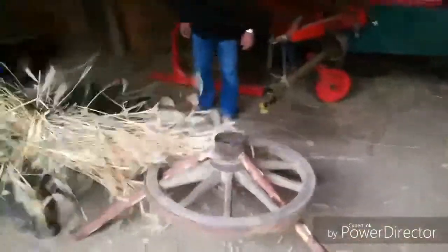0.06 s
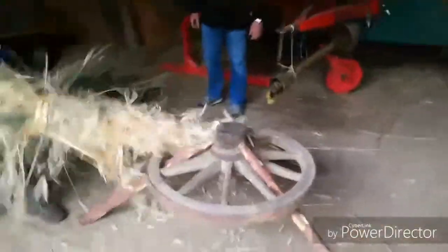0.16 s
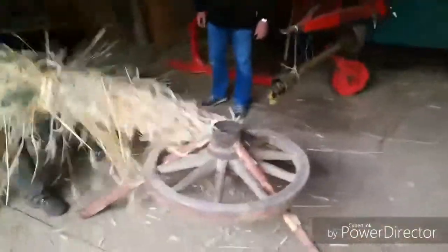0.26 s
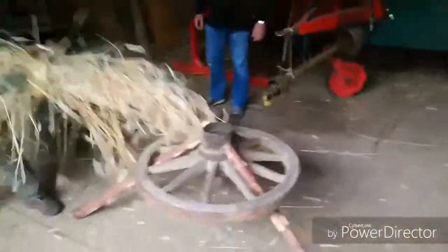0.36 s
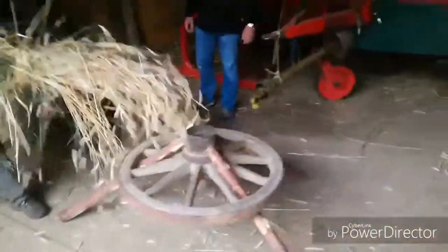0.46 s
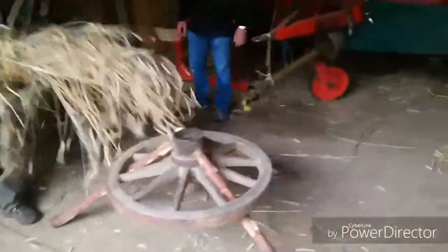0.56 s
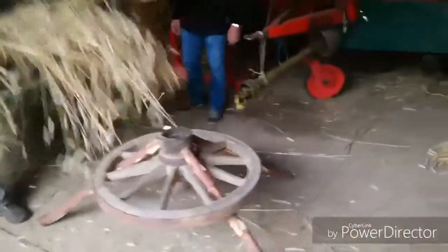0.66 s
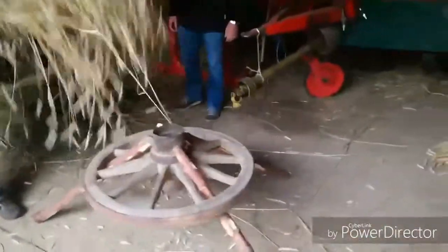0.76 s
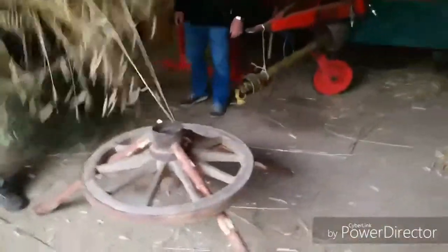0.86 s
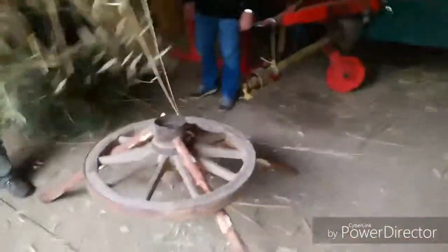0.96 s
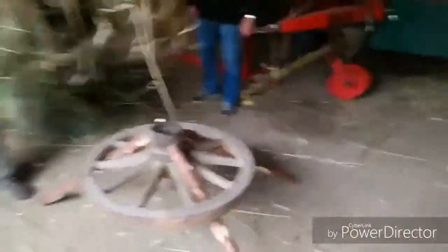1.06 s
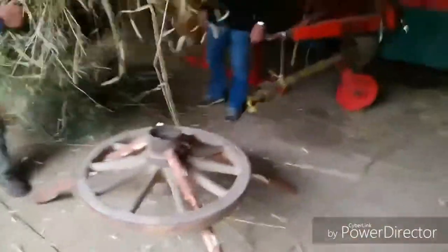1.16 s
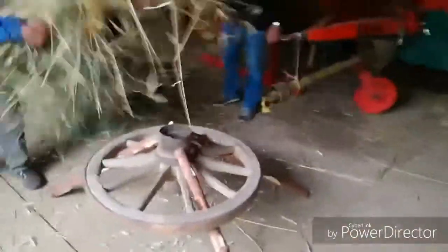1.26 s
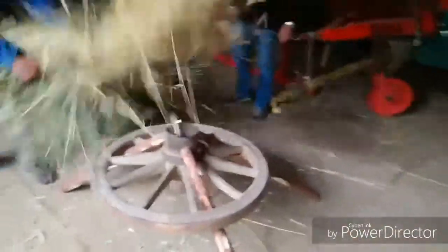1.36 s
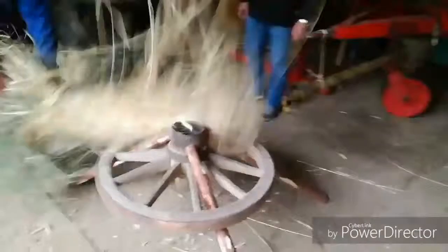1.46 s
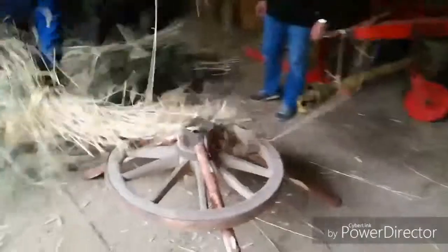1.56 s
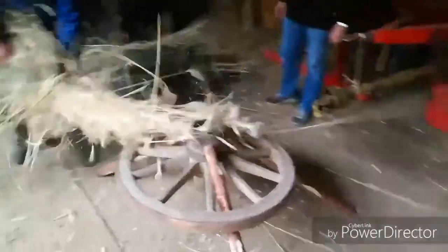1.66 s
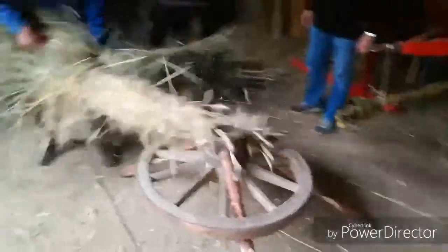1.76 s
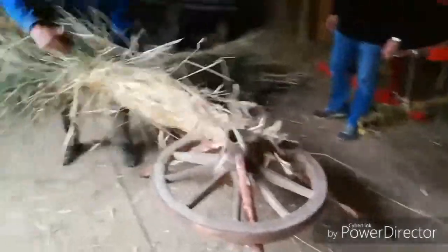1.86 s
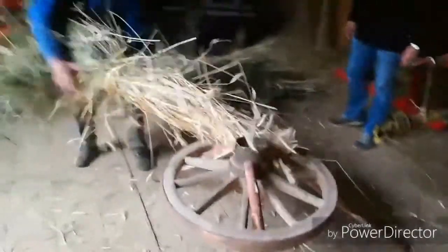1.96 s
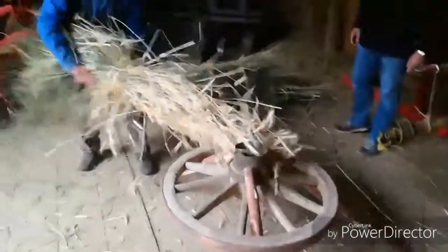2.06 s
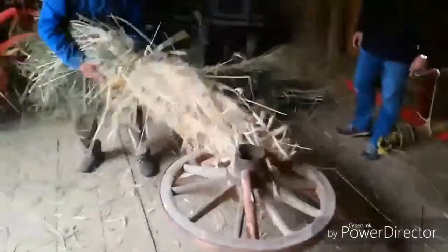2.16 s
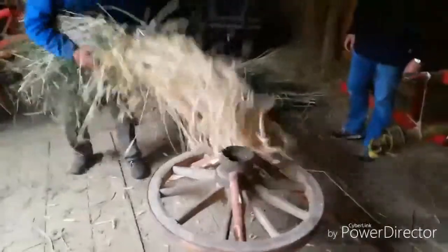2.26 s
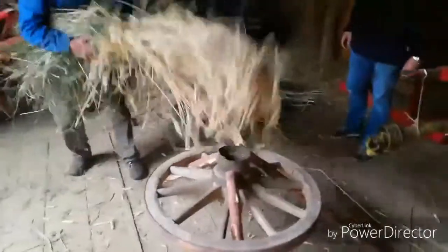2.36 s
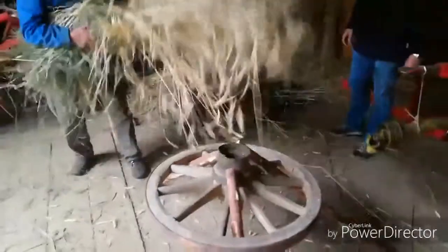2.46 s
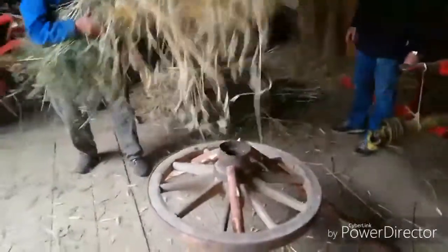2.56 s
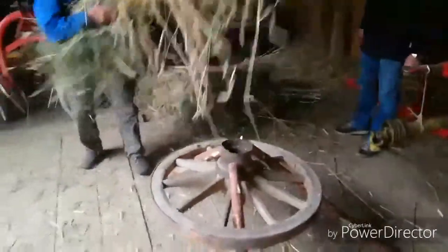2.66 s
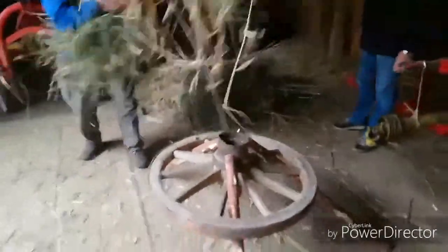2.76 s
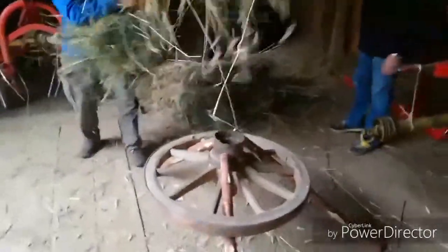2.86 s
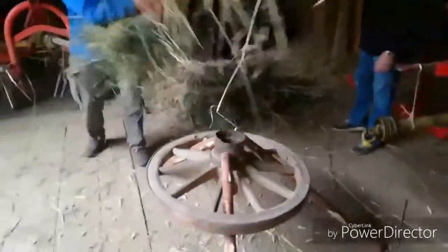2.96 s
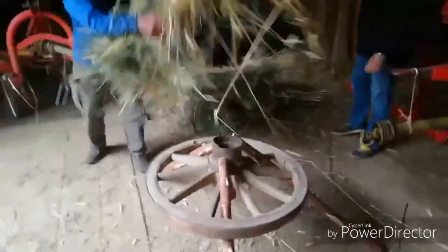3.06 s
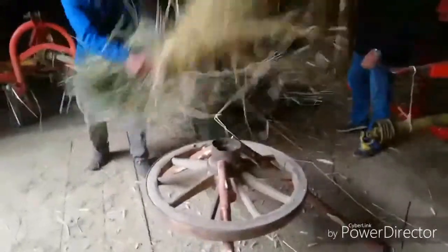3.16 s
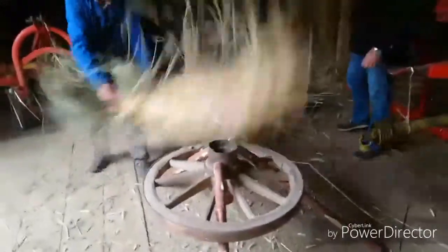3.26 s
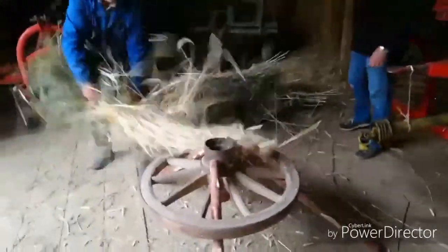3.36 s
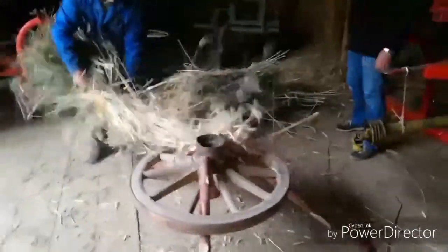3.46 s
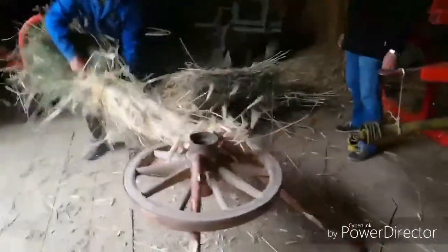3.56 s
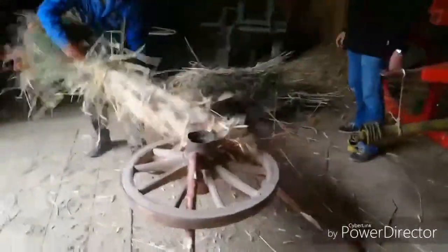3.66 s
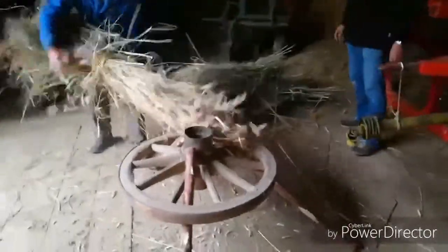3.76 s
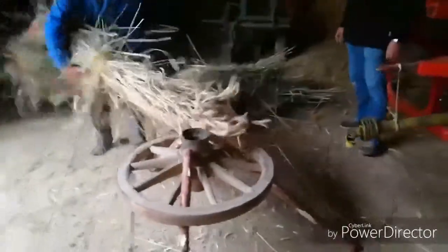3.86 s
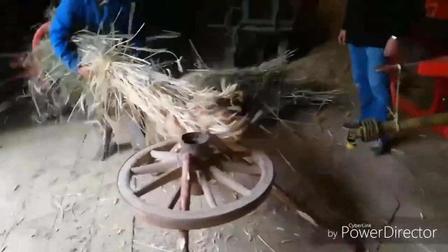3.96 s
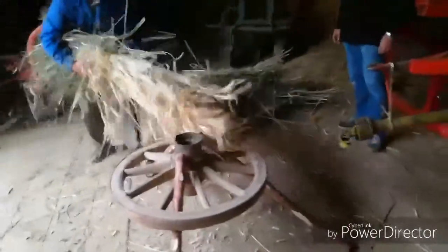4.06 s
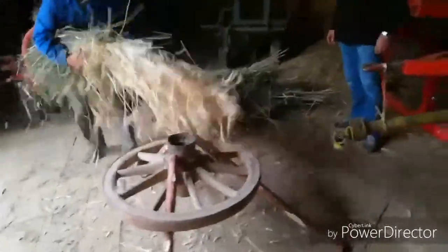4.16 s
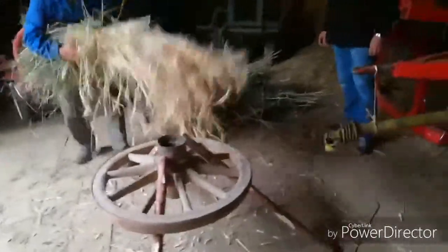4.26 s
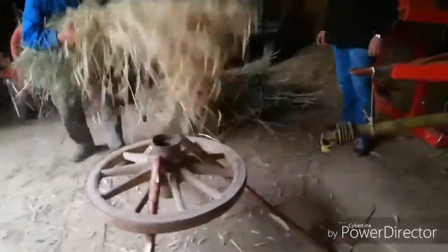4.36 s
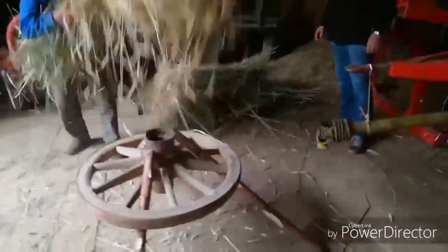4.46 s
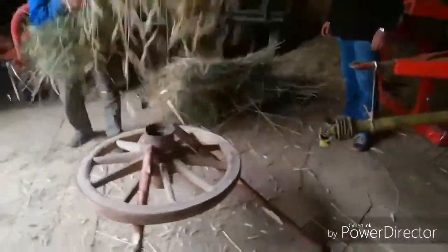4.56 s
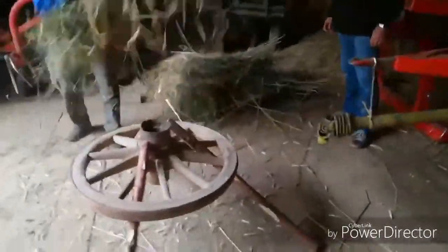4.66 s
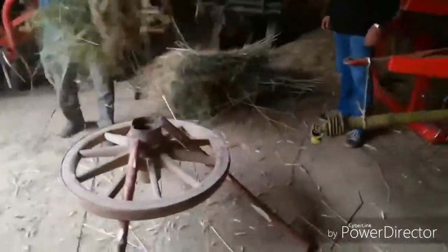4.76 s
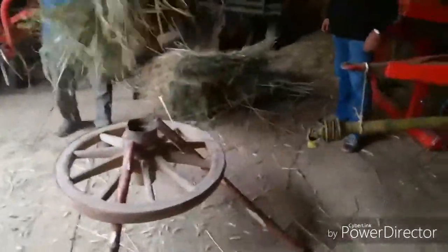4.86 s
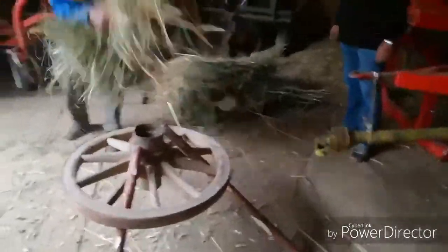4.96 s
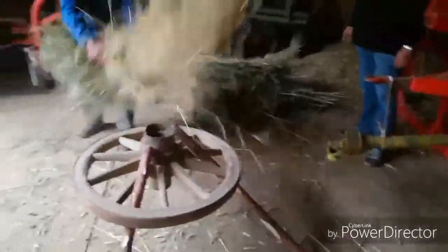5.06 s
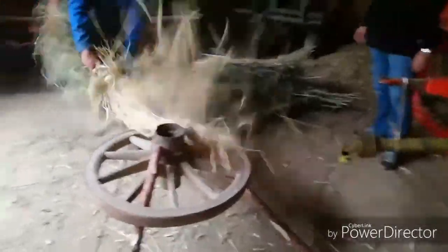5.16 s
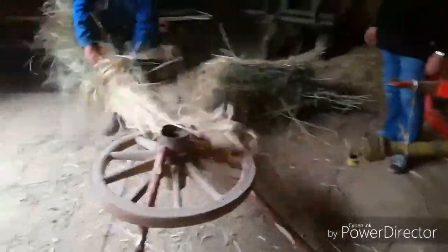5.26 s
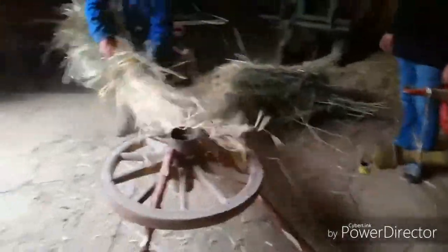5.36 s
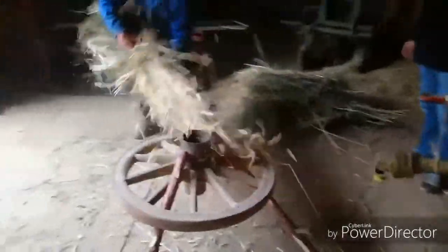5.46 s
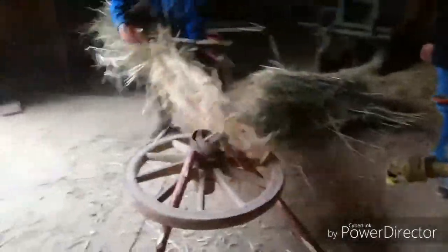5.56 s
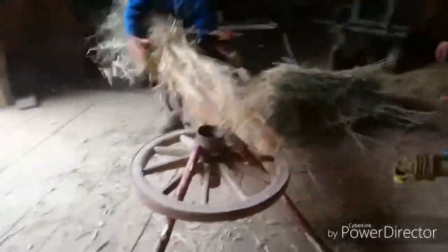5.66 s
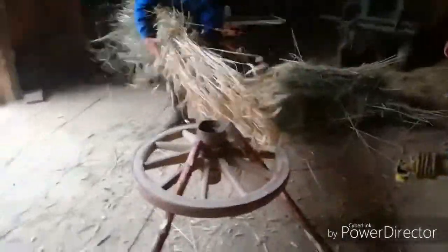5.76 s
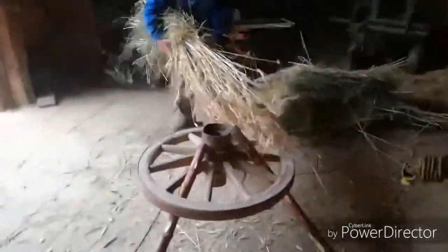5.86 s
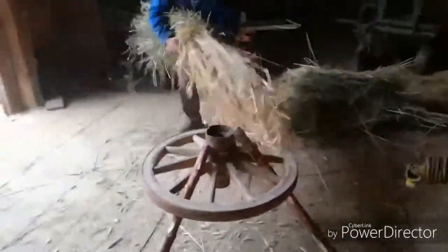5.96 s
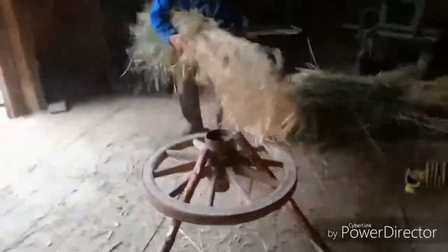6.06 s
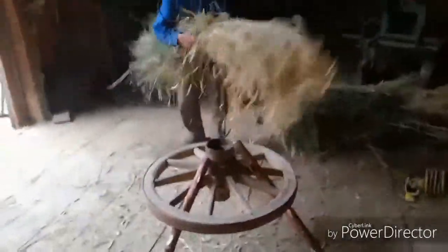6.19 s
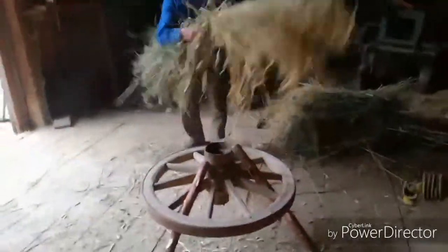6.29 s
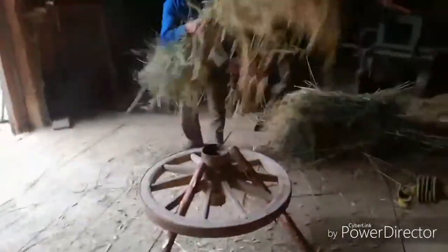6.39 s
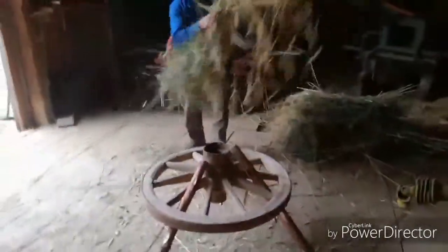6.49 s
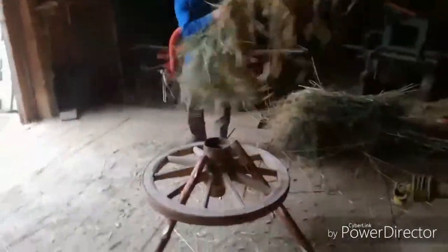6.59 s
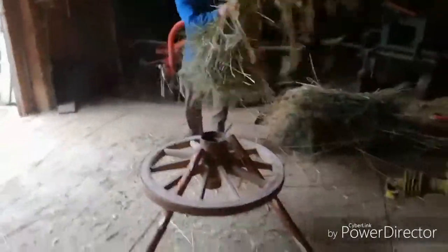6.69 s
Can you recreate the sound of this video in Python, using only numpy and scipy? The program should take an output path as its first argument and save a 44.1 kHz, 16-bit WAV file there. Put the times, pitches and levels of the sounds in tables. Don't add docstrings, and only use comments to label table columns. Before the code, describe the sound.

Crisp, hissing straw movement fills the foreground, with a faint low motor hum at the start that soon dies away. Three crackling swishes land on wood with dull knocks, each followed by a rustling tail. Stems snap, boards rumble underfoot, and one low wooden ring sounds before the last blow. Short barn echo; modest handheld device with slightly watery, limited treble.

```python
import sys
import numpy as np
from scipy import signal
from scipy.fft import rfft, irfft, next_fast_len
from scipy.io import wavfile
from scipy.ndimage import uniform_filter1d, minimum_filter1d

SR = 44100
rng = np.random.default_rng(int(sys.argv[2]) if len(sys.argv) > 2 else 0)


def magnitude_from_level(level_db):
    exponent = np.asarray(level_db, float) / 20
    return 10 ** exponent


def wav_out(sig):
    wavfile.write(sys.argv[1], SR, np.round(np.clip(np.atleast_2d(sig).T, -1, 1) * 32767).astype(np.int16))


N = 296793
T = np.arange(N) / SR
HZ = np.fft.rfftfreq(1024, 1 / SR)

# (first contact [s], stalks [dB], spread of landing [s], crush t60 [s], settling t60 [s])
BLOWS = [
    (1.454, -25.5, 0.042, 0.28, 0.87),
    (3.312, -21, 0.03, 0.097, 0.44),
    (5.162, -21.5, 0.016, 0.067, 0.53),
]


def evened(x):
    return x / np.sqrt(np.mean(x ** 2) + 1e-20)


def read(points, hz):
    f, value = np.transpose(points)
    return np.interp(np.log(hz + 1), np.log(f + 1), value)


def flicker(size):
    smooth = uniform_filter1d(rng.standard_normal(N), size)
    return evened(uniform_filter1d(smooth, size))


def patches(shape, bins, frames):
    smooth = uniform_filter1d(rng.standard_normal(shape), bins, axis=0)
    return evened(uniform_filter1d(smooth, frames, axis=1))


def spectra(x):
    return signal.stft(x, nperseg=1024, noverlap=768)[2]


def sound(z):
    return signal.istft(z, nperseg=1024, noverlap=768)[1][..., :N]


def coloured(x, points):
    size = next_fast_len(N)
    hz = np.fft.rfftfreq(size, 1 / SR)
    edge = np.minimum(hz / points[0][0], 1) ** 2
    shape = magnitude_from_level(read(points[:-1], hz)) * edge
    return evened(irfft(rfft(x, size) * shape, size)[..., :N])


def split(x, hz):
    low = signal.sosfiltfilt(signal.butter(2, hz, fs=SR, output="sos"), x)
    return low, x - low


def curve(column):
    # (time [s], stirring [dB], drag of thick stalks [dB])
    motion = [(0, -45, -2), (.36, -48, -12), (.79, -50, -3.5), (.94, -55.5, -6), (1.33, -50.5, -12),
              (1.5, -43.5, 0.5), (2.3, -43.5, 0.5), (2.72, -50, 0), (3.11, -46.5, -2), (3.48, -39.5, 4),
              (3.65, -45.5, -2), (4.09, -47, 4.5), (4.2, -49.5, -4), (4.7, -51.5, 5.5), (5.06, -47.5, -3.5),
              (5.3, -44.5, 2.5), (5.59, -49.5, 3), (6.73, -55, -8)]
    rows = np.array(motion)
    return np.interp(T, rows[:, 0], rows[:, column])


def shifting(column, still_db):
    # (time [s], length [s], boards [dB], hands [dB])
    shifts = [(0, 0.056, -69, -84), (0.27, 0.13, -87, -58), (0.926, 0.23, -78, -65),
              (1.652, 0.14, -61, -58.5), (1.872, .1, -63, -57), (2.05, 0.22, -61, -70),
              (2.356, 0.14, -59, -69), (2.88, 0.16, -72, -62.5), (3.3, .05, -79, -65),
              (3.51, 0.13, -54.5, -62), (4.068, 0.086, -57.5, -72), (5.207, .04, -50, -80),
              (5.355, 0.094, -59, -72), (5.59, 0.071, -64.5, -82), (6.34, .1, -75, -87),
              (2.85, .12, -70, -88)]
    level = magnitude_from_level(still_db)
    for row in shifts:
        level = level + magnitude_from_level(row[column]) * np.exp(-((T - row[0]) / row[1]) ** 2)
    return level


def hum():
    # (time [s], level [dB], pitch [Hz])
    motor = [(0, -71.5, 71.1), (.5, -64.5, 70.5), (1, -66, 70.9), (1.15, -71, 71.4), (1.45, -92, 69.3),
             (1.6, -110, 68)]
    s, db, hz = np.transpose(motor)
    wobble = np.interp(T, s, hz) * (1 + 0.043 * flicker(size=4000))
    level = magnitude_from_level(np.interp(T, s, db) + 1.5 * flicker(size=2500))
    return level * np.sin(2 * np.pi * np.cumsum(wobble) / SR)


def hands():
    # (pitch [Hz], level [dB per Hz])
    shaking = [(10, 7), (25, 2.5), (60, 2.5), (110, -18.5), (220, -41)]
    still_db = -72.5 - 0.5 * T
    x = coloured(rng.standard_normal(N), shaking)
    return x * shifting(column=3, still_db=still_db) * magnitude_from_level(2.5 * flicker(size=1500))


def rumble():
    # (pitch [Hz], level [dB per Hz])
    creak = [(70, 2), (120, 9.5), (200, 7), (330, 3.5), (450, -8.5), (800, -38.5)]
    x = coloured(rng.standard_normal((2, N)), creak)
    return x * shifting(column=2, still_db=-80) * magnitude_from_level(2.5 * flicker(size=900))


def struck(rows, width, onset):
    out, t = np.zeros(N + SR), np.arange(SR // 2) / SR
    for s, db, hz, t60 in rows:
        band = signal.butter(2, [hz / (1 + width), hz * (1 + width)], "bandpass", fs=SR, output="sos")
        ring = signal.sosfilt(band, rng.standard_normal(SR))[-len(t):]
        ring /= np.sqrt(uniform_filter1d(ring ** 2, int(3 * SR / hz)) + 1e-12)
        rise = onset * t60
        fade = magnitude_from_level(db - 60 * np.maximum(t - rise, 0) / t60)
        out[round(s * SR):][:len(t)] += ring * fade * np.minimum(t / rise, 1) ** 1.3
    return out[:N]


def knocks():
    # (time [s], level [dB], pitch [Hz], t60 [s])
    rings = [
        (3.345, -33, 2700, .12),
        (3.335, -38.5, 700, 0.14),
        (3.33, -41, 370, 0.19),
        (3.479, -47.5, 300, 0.2),
        (4.37, -69.5, 296, .2),
        (4.739, -51, 292, 0.41),
        (4.925, -63, 240, 0.14),
        (5.1, -63, 255, 0.13),
        (5.63, -43, 102, 0.11),
        (6.039, -56, 323, 0.23),
    ]
    # (time [s], level [dB], centre [Hz], t60 [s])
    thuds = [(0, -63, 149, .24), (1.468, -38.5, 1260, 0.24), (1.486, -40, 236, 0.23),
             (1.541, -50, 220, 0.29), (1.462, -42, 1600, 0.23), (3.325, -39.5, 159, 0.33),
             (3.328, -37, 1160, 0.18), (5.174, -35.5, 990, 0.062), (5.17, -45.5, 262, 0.36),
             (5.354, -45, 247, 0.093), (5.631, -54.5, 170, .1)]
    # (time [s], level [dB], centre [Hz], t60 [s])
    scuffs = [
        (.08, -67, 130, 0.22),
        (2.245, -56, 211, 0.52),
        (2.68, -62.5, 149, 0.71),
        (3.08, -70, 199, 0.25),
        (3.62, -65, 170, 0.29),
        (3.98, -57, 232, 0.47),
        (4.36, -74.5, 120, 0.36),
        (4.94, -72, 107, 0.25),
        (6.05, -61.5, 600, 0.28),
        (6.11, -64.5, 188, .23),
    ]
    # (time [s], level [dB], centre [Hz], t60 [s])
    tremors = [(.192, -53, 54.7, 0.16), (.301, -64, 59.6, 0.37), (1.569, -52, 40.3, 0.65),
               (1.74, -50, 59.5, 0.17), (1.86, -52.5, 59.6, .27), (2.801, -56, 81.5, 0.29),
               (3.391, -55.5, 35, 0.81), (4.015, -52, 49.3, 0.33), (4.729, -56, 84, 0.4),
               (5.185, -45, 70, 0.12), (5.229, -54.5, 40, .86), (5.7, -63, 89.5, 0.42), (3.9, -66, 45, .3),
               (2.55, -63, 45, 0.34)]
    wood = struck(rings, width=0.061, onset=0.043) + struck(thuds, width=0.38, onset=0.029)
    return wood + struck(scuffs, width=0.69, onset=0.077) + struck(tremors, width=0.57, onset=0.046)


def ticks(per_s, spread_db, hiss):
    out = np.zeros((2, N))
    for hz in np.geomspace(600, 15000, num=10):
        t = np.arange(int(3.0 * SR / hz) + 3) / SR
        grain = np.sin(2 * np.pi * hz * t) * np.hanning(len(t))
        size = magnitude_from_level(spread_db * np.minimum(rng.exponential(1, (2, N)), 4))
        hits = size * (rng.random((2, N)) < per_s / SR * hz / 3000)
        layer = signal.oaconvolve(hits, grain[None])[:, :N]
        out += evened(layer) * np.sqrt(hz)
    return evened(out) + hiss * rng.standard_normal((2, N))


def rustle():
    # (pitch [Hz], level [dB per Hz])
    straw_colour = [(210, -29), (350, -13.5), (391, -16.5), (564, -11), (1330, -0.5), (2070, 2.5),
                    (2390, 0.5), (7280, 0.5), (8130, -4.5), (8950, -3.5), (11200, -9), (14600, -5.5),
                    (15600, -9)]
    # (time [s], swell [dB], length [s])
    slips = [(.62, -0.5, .08), (1.07, 1.5, .05), (1.399, 3.5, 0.029), (1.682, -2, 0.033),
             (2.06, 3.5, 0.066), (2.835, 3, .035), (2.917, -2, .06), (3.797, 1, 0.01), (4.136, 2, .018),
             (5.28, 5.5, .016), (5.69, 2, .03), (6.07, 2.5, 0.076), (6.324, -2, 0.054), (4.51, -2.5, 0.15),
             (3.29, 0.5, 0.036), (5.14, 4.5, 0.056), (2.5, 1.5, .06), (3.551, -3.5, 0.055)]
    x = coloured(ticks(per_s=700, spread_db=2.0, hiss=1.37), straw_colour)
    rest, top = split(x, 8000)
    body, middle = split(rest, 1090)
    clumps_db = 0.54 * flicker(size=2500) + 0.12 * flicker(size=120)
    for s, db, length in slips:
        clumps_db += db * np.exp(-((T - s) / length) ** 2)
    top_db = np.full(N, 3.0)
    for s, *_ in BLOWS:
        top_db += 9 * (T > s) * np.exp(-abs(T - s) / 0.055)
    stalks = middle + top * magnitude_from_level(top_db) + body * magnitude_from_level(curve(column=2))
    return stalks * magnitude_from_level(curve(column=1) + 2.0 + clumps_db)


def snaps():
    # (time [s], peak [dB], pitch [Hz])
    breaks = [
        (1.375, -51, 1540),
        (1.397, -43, 1700),
        (1.917, -33, 1220),
        (3.299, -39, 1760),
        (4.149, -49, 1880),
        (5.924, -51, 2330),
    ]
    out, t = np.zeros(N + SR), np.arange(400) / SR
    for s, db, hz in breaks:
        swell = np.exp(-((t - .0015) / 0.00068) ** 2)
        out[round(s * SR):][:len(t)] += magnitude_from_level(db) * swell * np.sin(2 * np.pi * hz * t)
    return out[:N]


def blows():
    # (pitch [Hz], level [dB per Hz])
    crush_colour = [(240, -64), (400, -18), (496, -23), (695, -8.5), (929, -13), (1070, -9.5), (2370, -3),
                    (2640, -1.5), (2890, -5), (7470, -3.5), (11500, -10.5), (14700, -7), (15600, -11)]
    hold_s, settle_db = 0.014, -10
    envelope = np.zeros(N)
    for s, db, spread, crush, settle in BLOWS:
        landing = np.clip((T - s) / spread, 0, 1) ** 1.12
        since = np.maximum(T - s - spread - hold_s, 0)
        fade = magnitude_from_level(-60 * since / crush) + magnitude_from_level(settle_db - 60 * since / settle)
        envelope += magnitude_from_level(db) * landing * fade
    x = coloured(ticks(per_s=970, spread_db=4.5, hiss=0.45), crush_colour)
    return x * envelope * magnitude_from_level(0.34 * flicker(size=90))


def barn(x):
    # (pitch [Hz], t60 [s])
    dying = [(100, 0.61), (600, 0.4), (2000, 0.27), (8000, 0.26), (16000, 0.083)]
    hz, t, z = signal.stft(rng.standard_normal((2, SR)), SR, nperseg=256)
    fade = magnitude_from_level(-60 * t / read(dying, hz)[:, None])
    tail = signal.istft(z * fade, SR, nperseg=256)[1]
    tail[:, :400] = 0
    return signal.fftconvolve(x, tail / np.linalg.norm(tail[0]), axes=1)[:, :N]


def ports(x):
    # (pitch [Hz], likeness of the ports [0 to 1])
    likeness = [(130, 1), (290, 0.76), (640, 0.069), (1200, 0.54), (2500, 0.014), (6500, 0.01),
                (9000, 0.35), (15000, 0.033)]
    # (pitch [Hz], left minus right [dB])
    balance = [(60, 1), (110, 7), (200, -1), (380, 0), (700, -2), (1290, 3.5), (2380, 2.5), (4400, -4),
               (8120, -0.5), (15000, 2)]
    a, b = spectra(x)
    same = np.clip(read(likeness, HZ), 0, 1)[:, None]
    right = same * a + np.sqrt(1 - same ** 2) * b
    lean = magnitude_from_level(read(balance, HZ) / 2 * (HZ > 300))[:, None]
    uneven = magnitude_from_level(0.66 * patches(a.shape, bins=40, frames=6))
    return sound(np.array([a * lean, right / lean]) * uneven)


def scene():
    straw, wood = blows() + snaps(), knocks()
    near = ports(straw + magnitude_from_level(-8.5) * barn(straw) + rustle() + rumble())
    echo = split(barn(np.array([wood, wood])), 260)[1]
    knock = wood * magnitude_from_level([[.3], [-.3]])
    return near + knock + magnitude_from_level(-12) * echo * [[1.3], [1]] + hands() + hum()


def top_cut(x):
    return signal.sosfilt(signal.butter(12, 16620, fs=SR, output="sos"), x)


def record(dry):
    # (centre [Hz], width [Hz], level [dB], wander [dB])
    seam = (8074, 142, -19, 9)
    z = spectra(dry)
    shape = z.shape[1:]
    odds = np.interp(HZ, [900, 2000, 4500, 7500], [.0002, .0019, .0014, .0003])[:, None]
    seeds_db = -55 * rng.random(shape) * (rng.random(shape) < odds)
    holes_db = minimum_filter1d(minimum_filter1d(seeds_db, size=4, axis=0), size=9, axis=1)
    streaks_db = 2.82 * patches(shape, bins=1, frames=7) * (HZ > 700)[:, None]
    hz, width, db, wander_db = seam
    depth_db = db + wander_db * flicker(size=2000) + 1.2 * (curve(column=1) + 50)
    moments = np.minimum(np.arange(z.shape[2]) * 256, N - 1)
    seam_db = np.exp(-((HZ - hz) / width) ** 4)[:, None] * np.minimum(depth_db[moments], 0)
    kept = magnitude_from_level(holes_db + streaks_db + seam_db) * (HZ < 15760)[:, None]
    return top_cut(sound(z * kept))


dry = scene()
out = record(dry)
wav_out(out)
```